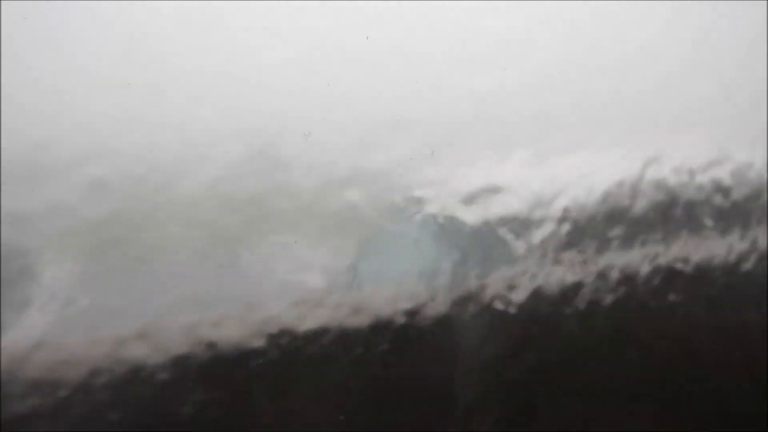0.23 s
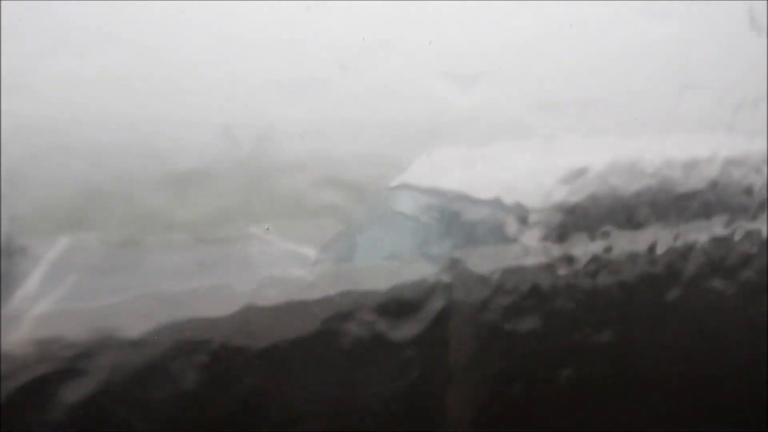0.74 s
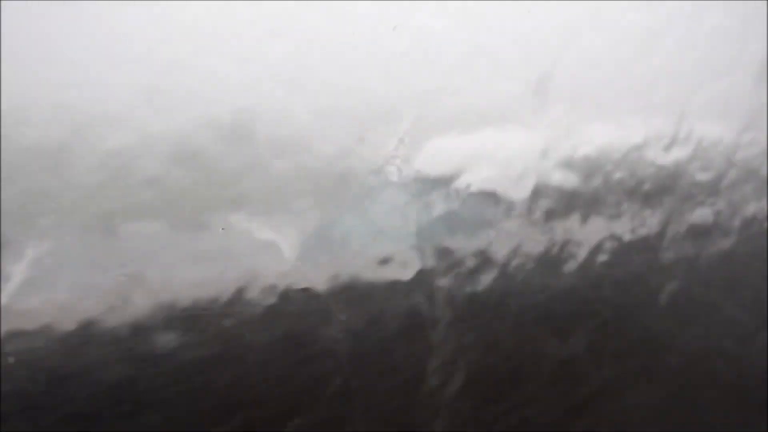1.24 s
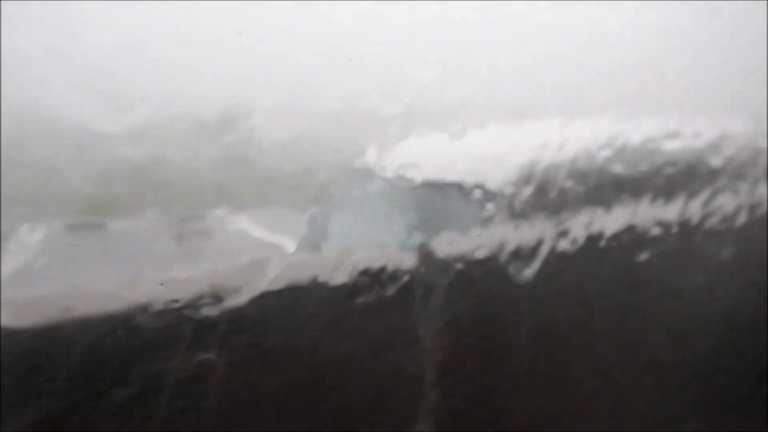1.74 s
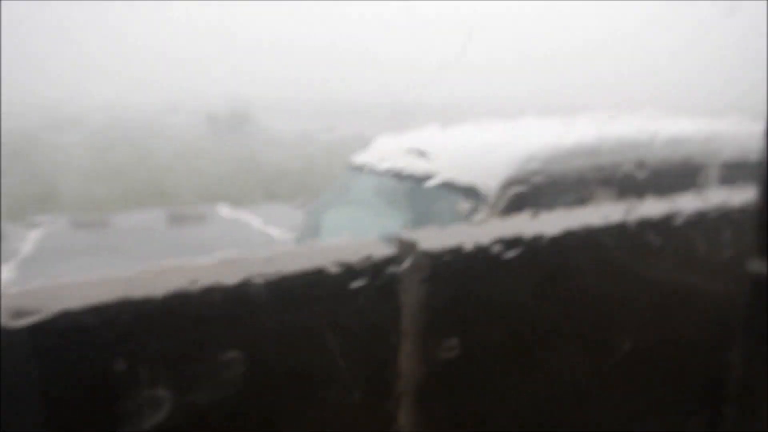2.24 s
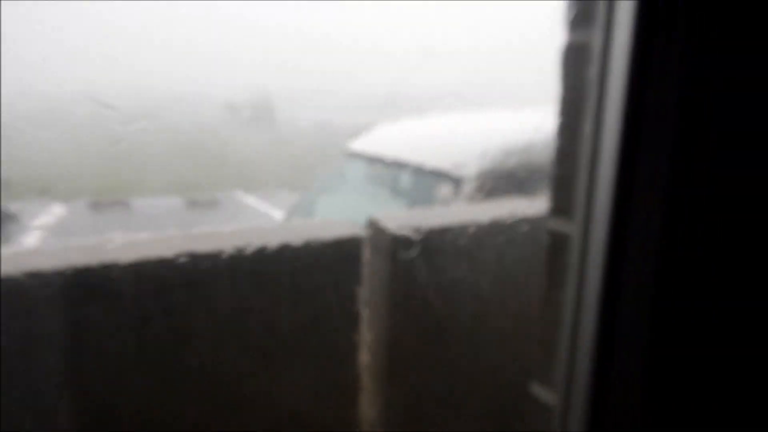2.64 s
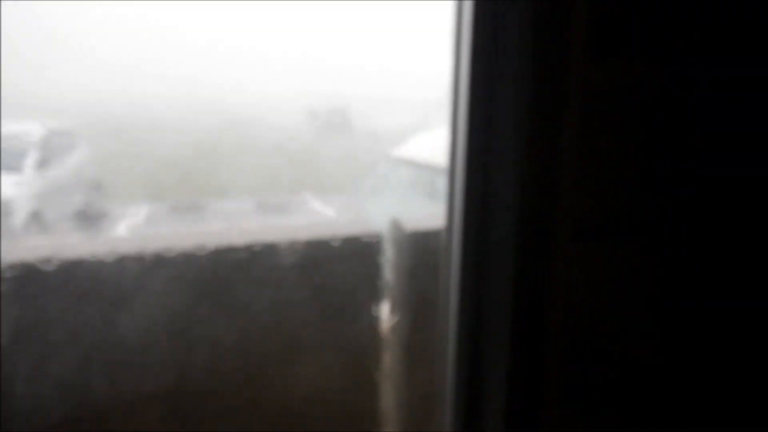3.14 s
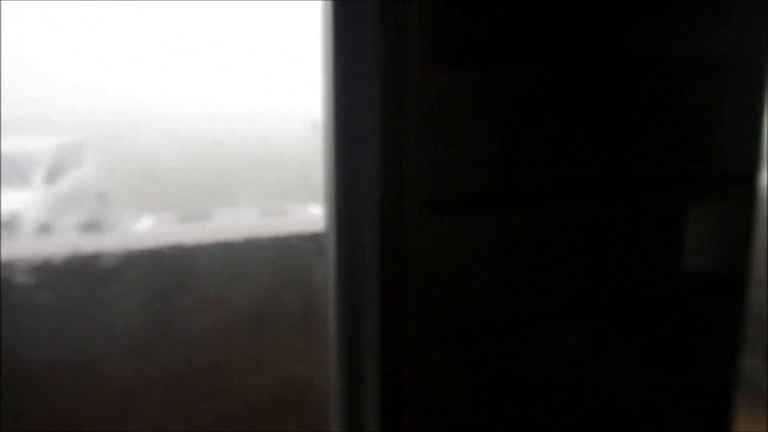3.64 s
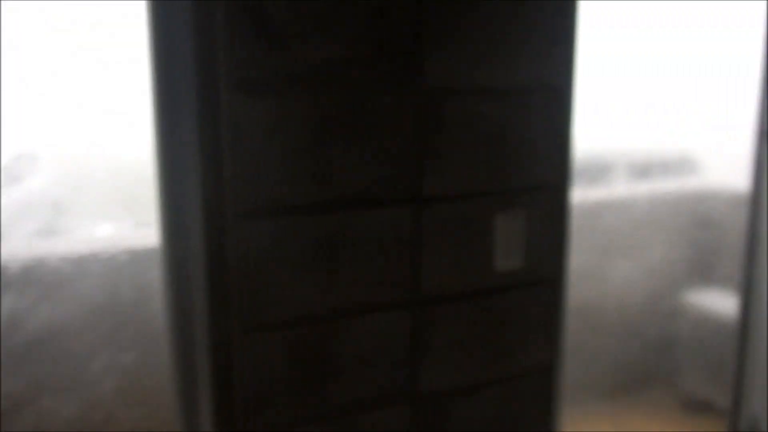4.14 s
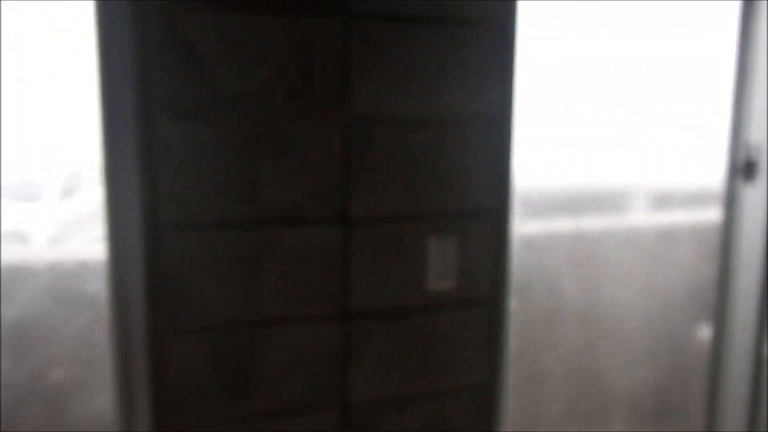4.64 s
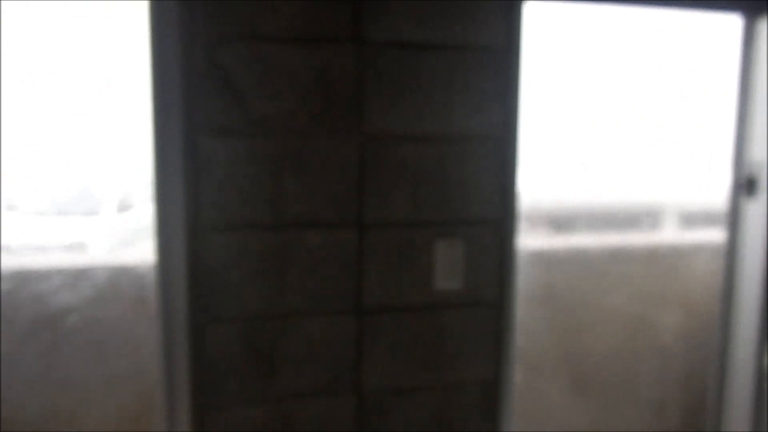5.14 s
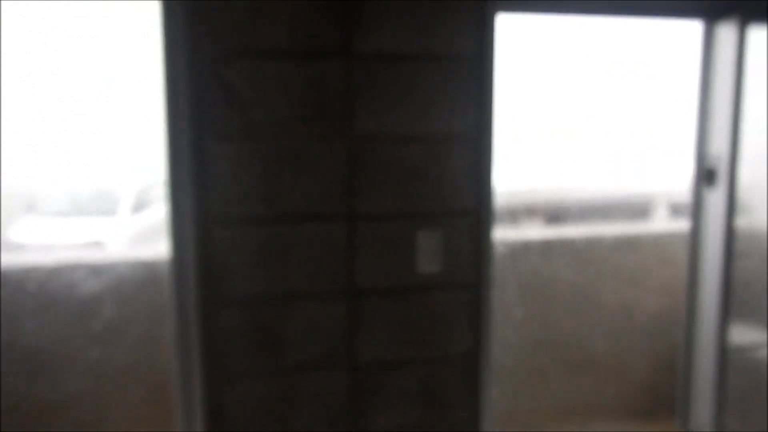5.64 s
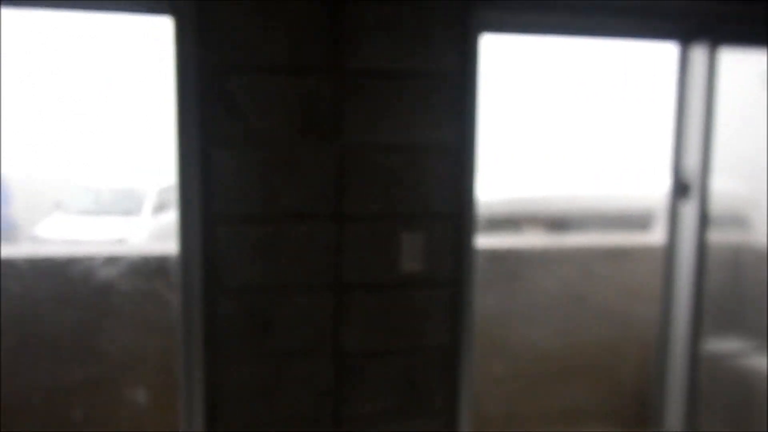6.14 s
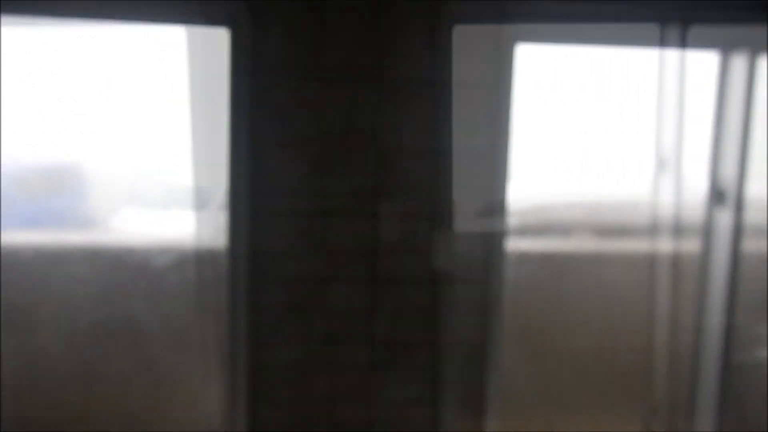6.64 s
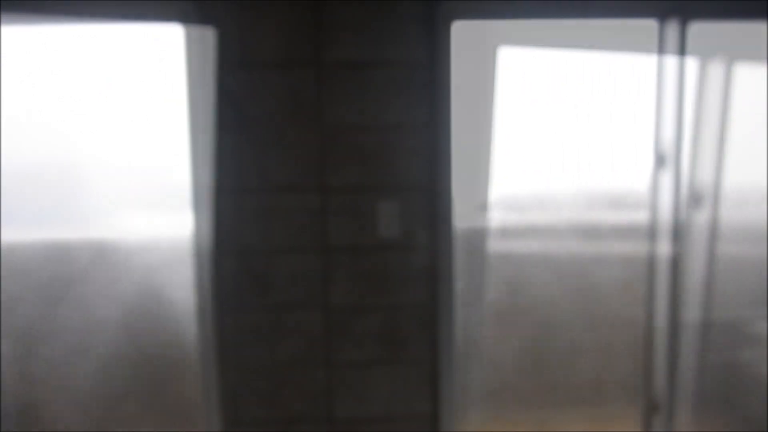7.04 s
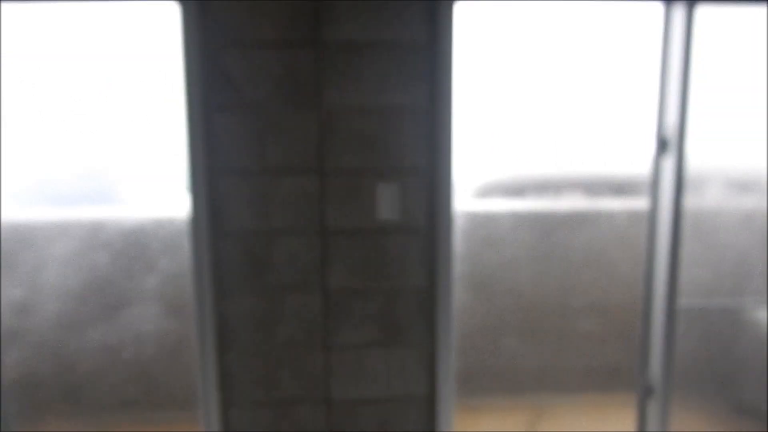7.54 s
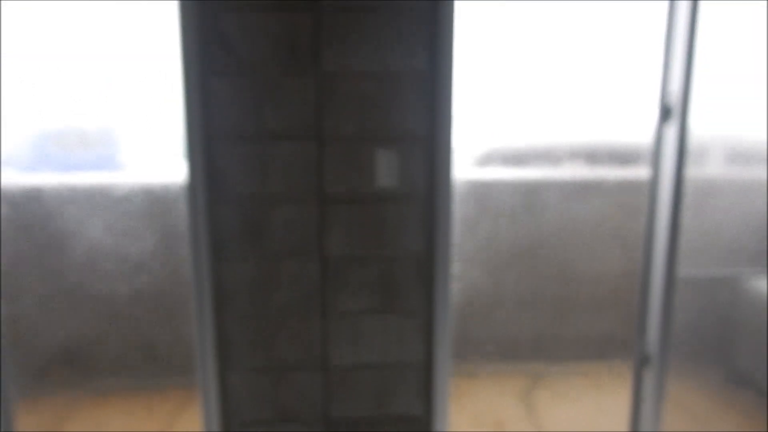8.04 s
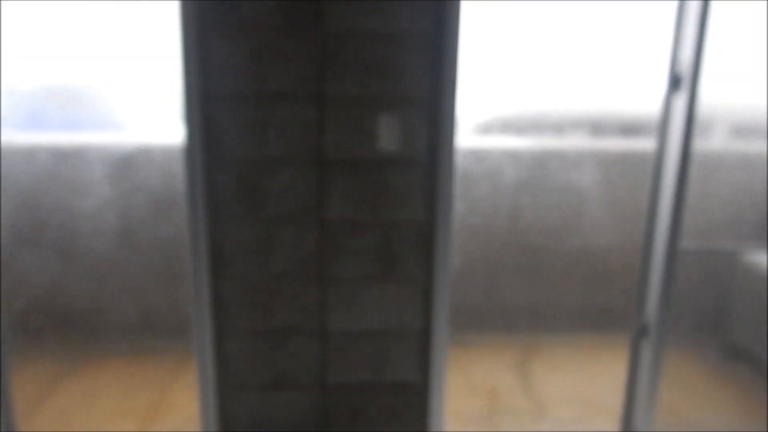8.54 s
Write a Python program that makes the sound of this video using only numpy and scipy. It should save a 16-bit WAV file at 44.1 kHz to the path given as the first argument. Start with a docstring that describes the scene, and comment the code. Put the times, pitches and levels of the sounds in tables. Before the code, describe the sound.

Storm rain lashes glass doors in dense hissing sheets while wind gusts thump and rumble low, loud at first, then easing and surging again.

```python
"""Inside a room with glass doors, a storm drives sheets of rain against the panes.
Spray fizzes close by: dense random taps and hiss, shaped by the colour of the ringing panes.
Behind it rain roars outdoors as smooth noise, and gusts rumble as lumpy low noise.
Wavering tones moan in the door frame, and a few heavy drops ring briefly.
Two close ports pick it all up through narrow notches, with a thin hiss on top."""
import sys
import numpy as np
from scipy import signal
from scipy.fft import rfft, irfft
from scipy.io import wavfile
from scipy.ndimage import uniform_filter1d

SR = 44100
rng = np.random.default_rng(int(sys.argv[2]) if len(sys.argv) > 2 else 0)


def ratio_of_db(decibels):
    """Turn decibels (scalar or array-like) into linear amplitude factors; 0 dB maps to 1."""
    return 10 ** (np.asarray(decibels, float) / 20)


def transcribe(signal):
    """Save signal, clipped to [-1, 1], as a 16-bit WAV file at the path in sys.argv[1]."""
    frames = np.atleast_2d(signal).T
    limited = np.clip(frames, -1, 1)
    pcm = np.round(limited * 32767).astype(np.int16)
    wavfile.write(sys.argv[1], SR, pcm)


N = 388080  # samples, 8.8 s


def evened(x):
    """Scales to rms 1."""
    return x / np.sqrt(np.mean(np.abs(x) ** 2) + 1e-20)


def read(points, hz):
    """Columns of a table over log frequency."""
    f, *columns = np.transpose(points)
    return np.squeeze([np.interp(np.log(hz + 1), np.log(f + 1), c) for c in columns])


def follow(rows, t):
    """Columns of a table over time."""
    s, *columns = np.transpose(rows)
    return [np.interp(t, s, c) for c in columns]


def smooth(curve):
    """Evaluates a slow curve every 100 samples and joins the dots."""
    t = np.arange(0, N + 100, 100) / SR
    return np.interp(np.arange(N) / SR, t, curve(t))


def hump_db(hz, centre_hz, width, db):
    """A resonance as a rise in level; width in Hz spans the points at half its dB."""
    return db / (1 + (2 * (hz - centre_hz) / width) ** 2)


def levelled(points, hz, low_hz, high_hz):
    """A spectrum for white input whose band low-high has power 1."""
    grid = np.arange(low_hz, high_hz)
    band_power = np.sum(ratio_of_db(2 * read(points, grid))) / (SR / 2)
    return read(points, hz) - 10 * np.log10(band_power)


def coloured(x, field_db, frame, patchy_db, patch_hz, patch_s):
    """Shapes two raw streams by a level field over frequency and time, with drifting patches."""
    overlap = frame * 3 // 4
    hz, t, z = signal.stft(x, SR, nperseg=frame, noverlap=overlap)
    patches = rng.standard_normal((len(t), len(hz)))
    patches = uniform_filter1d(patches, max(round(patch_s / t[1]), 1), 0)
    patches = uniform_filter1d(patches, max(round(patch_hz / hz[1]), 1), 1)
    gain = ratio_of_db(field_db(hz[:, None], t) + patchy_db * evened(patches).T)
    return signal.istft(z * gain, SR, nperseg=frame, noverlap=overlap)[1][:, :N]


def swells_db(events, t, rise, fall):
    """Summed level of swells that climb to each peak and sink at set dB a second."""
    s, peak_db = np.transpose(events)[:, :, None]
    each_db = peak_db - np.where(t < s, rise * (s - t), fall * (t - s))
    return 10 * np.log10(np.sum(ratio_of_db(2 * each_db), 0))


# Slow level of the wind rumble; the level drops suddenly at 1.5 and 7.55 s.
# Each row: time in seconds, relative level in dB.
SLOW_LEVEL = [(0, -27.5), (1.47, -29), (1.5, -34.5), (2.3, -40.5), (3.0, -41.5), (3.6, -41.5), (4.3, -42),
              (5.1, -42), (6.1, -42), (6.5, -34.5), (7.54, -33.5), (7.57, -40.5), (7.95, -39.5),
              (8.7, -38.5)]
# Single gusts that thump the building. Each row: time of the peak in seconds, relative peak in dB.
GUSTS = [(.14, -21), (.42, -26), (.68, -22.5), (1.24, -30), (3.76, -44), (4.6, -35.5), (5.3, -43),
         (5.86, -41), (6.42, -33.5), (7.14, -29.5), (8.23, -43), (8.8, -31.5)]


def rumble_level_db(t):
    """The slow level and the single gusts add as powers."""
    gusts_db = swells_db(GUSTS, t, rise=70, fall=78)  # dB per second
    return 10 * np.log10(ratio_of_db(2 * follow(SLOW_LEVEL, t)[0]) + ratio_of_db(2 * gusts_db))


# Colour of the building's rumble. Each row: frequency in Hz, relative level in dB per Hz.
BUILDING = [(15, -3.5), (24, 0.5), (38, -2), (60, -5.5), (90, -1.5), (140, -3), (220, -6.5), (400, -14.5),
            (1000, -28), (20000, -76)]
# Boom of the room under the gusts.
# Each row: time in seconds, boom in dB, deepest shudder in dB.
BOOM = [(0, 5.5, -4), (.9, 6.5, -4), (1.4, 4, -2.5), (2.8, 2.5, 2.5), (4.6, 3, -5), (5.7, 7.5, 4.5),
        (7, 4.5, 7), (8.3, 4, -3)]


def rumble():
    """Wind pressure is lumpy low noise, its level reshaped by the boom and the deepest shudder."""
    def field_db(hz, t):
        boom_db, shudder_db = follow(BOOM, t)
        building_db = levelled(BUILDING, hz, 84, 250)[:, None]
        return building_db + hump_db(hz, 136, 41, boom_db) + hump_db(hz, 25, 60, shudder_db)

    noise = rng.standard_normal((2, N))
    lumpy = coloured(noise, field_db, frame=3400, patchy_db=2.5, patch_hz=50, patch_s=0.12)
    return lumpy * ratio_of_db(smooth(rumble_level_db) - 4.0)


def moan(level_db, hz, waver_hz, waver_db):
    """Wind in a gap holds a tone whose pitch and strength waver."""
    strength, pitch = (evened(uniform_filter1d(uniform_filter1d(v, size=3000), size=3000))
                       for v in rng.standard_normal((2, N)))
    phase = 2 * np.pi * np.cumsum(hz + waver_hz * pitch) / SR
    return ratio_of_db(level_db + waver_db * strength) * np.sin(phase)


# Puffs through the gap that swell and die. Each row: time of the peak in seconds, peak in dB.
PUFFS = [(0, -21.5), (.7, -37), (1.12, -27), (1.46, -37), (2, -38), (2.34, -40), (2.7, -36), (3.42, -44.5),
         (3.91, -45), (4.53, -54), (4.99, -48), (5.63, -41), (6.08, -49), (6.3, -33), (6.54, -31),
         (6.83, -31), (7.15, -32), (7.5, -36), (7.77, -35.5), (8.42, -40.5), (8.8, -32)]
# Low moan, its pitch creeping up and back. Each row: time in seconds, central pitch in Hz.
LOW_PITCH = [(0, 55.5), (1.2, 57.8), (2.1, 55), (2.7, 58.8), (3.5, 56), (5, 61.7), (6.6, 69), (7.5, 70.2),
             (8.8, 64)]
# A fainter, higher moan late on.
# Each row: time in seconds, level in dB before the waver, central pitch in Hz.
HIGH_MOAN = [(4.95, -62, 262), (5.1, -45.5, 260.8), (5.9, -48.5, 249.5), (6.35, -43, 233),
             (7.6, -47.5, 233.7), (8.45, -41, 233), (8.8, -48.5, 238)]


def frame_moans():
    """Gaps of the door frame sound a low tone in puffs and a higher one late on."""
    t = np.arange(N) / SR
    puffs_db = smooth(lambda s: swells_db(PUFFS, s, rise=98, fall=39))  # dB per second
    low = moan(puffs_db, *follow(LOW_PITCH, t), waver_hz=3.9, waver_db=2)
    high = moan(*follow(HIGH_MOAN, t), waver_hz=3, waver_db=2)
    return low + high


# Colour of the rain outdoors. Each row: frequency in Hz, relative level in dB per Hz.
YARD = [(120, -9.5), (250, 0), (420, -7), (550, -2.5), (800, -3), (1200, 1), (1800, 1.5), (2400, -9),
        (4000, -25), (6200, -17), (8000, -25.5), (15500, -67)]
# How far each frequency follows the depth of the roar. Each row: frequency in Hz, share.
DEPTH = [(200, 0.25), (500, 0.96), (800, 0.032)]


def roar():
    """Distant rain is smooth noise that partly follows spray and slow level, which also deepens it."""
    def field_db(hz, t):
        spray_db = follow(SPRAY, t)[0] + 24  # above its usual -24 dB
        slow_db = follow(SLOW_LEVEL, t)[0] + 36  # above its usual -36 dB
        level_db = -33 + 0.3 * spray_db + 0.36 * slow_db
        depth_db = 1 + 0.37 * slow_db
        yard_db = levelled(YARD, hz, 250, 1386)[:, None]
        return yard_db + level_db + read(DEPTH, hz)[:, None] * depth_db

    noise = rng.standard_normal((2, N))
    return coloured(noise, field_db, frame=1024, patchy_db=0.46, patch_hz=300, patch_s=0.11)


# Heavy single drops.
# Each row: start in seconds, level in dB before the soft onset, ring in Hz.
DROPS = [(4.124, -12, 1270), (4.44, -12, 3900), (7.15, -8, 3800)]


def drops(t60=0.015, rise_s=0.0008):
    """A heavy drop is a short ring of the pane, sinking 60 dB in t60 seconds."""
    out, t = np.zeros(N), np.arange(2000) / SR
    for s, db, hz in DROPS:
        part = out[round(s * SR):][:len(t)]
        onset = 1 - np.exp(-t / rise_s)
        part += ratio_of_db(db - 60 * t / t60) * onset * np.sin(2 * np.pi * hz * t)
    return out


# Spray on the glass, sheet after sheet. Each row: time in seconds, relative level in dB.
SPRAY = [(0.0, -14), (0.42, -19), (0.46, -15.5), (0.78, -17.5), (0.83, -15.5), (0.98, -16.5), (1.22, -12.5),
         (1.81, -21.5), (2.13, -31), (2.55, -29), (2.7, -31.5), (2.84, -27), (3.26, -31), (3.48, -40.5),
         (3.65, -36), (3.7, -28), (3.97, -30.5), (4.09, -22.5), (4.36, -23.5), (4.44, -18), (4.8, -21.5),
         (4.92, -28), (4.97, -25.5), (5.32, -32), (5.66, -33), (5.78, -24), (5.86, -25.5), (6.15, -43.5),
         (6.59, -26.5), (6.69, -26), (6.74, -20.5), (6.86, -17), (7.03, -22), (7.08, -20), (7.5, -20),
         (7.57, -24.5), (7.72, -23.5), (7.97, -27.5), (8.21, -23), (8.38, -26.5), (8.8, -25.5)]
# Colour of the spray. Each row: time in seconds, extra low ring in dB, extra treble in dB,
# main pane ring in dB, main pane ring in Hz.
SHEETS = [(0, 2.5, 0.5, -2, 3830), (.8, 2, .5, -1, 3850), (1.5, 4.5, -2, 0, 3750), (1.8, 3, 1, 2, 3720),
          (2.1, 3.5, 2.5, 4, 3660), (2.9, 4.5, 1, -0.5, 3770), (3.75, 6, 0, 4.5, 3520),
          (4.3, 1.5, -5.5, 4.5, 3680), (4.9, 1, -1, 0.4, 3840), (5.5, 2.5, -2, 0, 3700),
          (5.8, -0.5, 5, 2.5, 3700), (6.5, -0.5, 3.5, 4.5, 3750), (6.9, -1.5, 0.5, 2, 3870),
          (7.7, 1, 2, 6, 4000), (8.8, 0, 1.5, 3, 3900)]
# Colour of the ringing panes. Each row: frequency in Hz, relative level in dB per Hz.
PANE = [(600, -31.5), (1100, -32.5), (1600, -9), (2200, -6.5), (3000, -5.5), (3700, -1.5), (4150, -7),
        (4600, -6), (5100, -10), (6100, -10), (7000, -17.5), (8000, -32), (10500, -39), (13000, -51),
        (15500, -67.5)]
# How far each frequency follows the weight (low ring) and the mist (treble) of the spray.
# Each row: frequency in Hz, share.
WEIGHT = [(1000, 0), (2300, 1), (3500, 0.19)]
MIST = [(4300, 0.09), (5500, 0.16), (9000, 1), (14000, 1)]


def spray(per_s=9000, spread_db=4.0, hiss=1.94, flicker_db=0.56):
    """Thousands of drops a second ring the panes; the finest merge into hiss."""
    size_db = spread_db * np.minimum(rng.exponential(1, (2, N)), 3)  # caps the largest drops
    size = ratio_of_db(size_db) * rng.choice([-1., 1.], (2, N))
    taps = evened(size * (rng.random((2, N)) < per_s / SR))
    raw = evened(taps + hiss * rng.standard_normal((2, N)))
    clumps = uniform_filter1d(uniform_filter1d(rng.standard_normal(N), size=700), size=700)
    # drops land in clumps
    level_db = follow(SPRAY, np.arange(N) / SR)[0] + flicker_db * evened(clumps)

    def field_db(hz, t):
        weight_db, mist_db, ring_db, ring_hz = follow(SHEETS, t)
        pane_db = levelled(PANE, hz, 2720, 7000)[:, None]
        low_db = read(WEIGHT, hz)[:, None] * weight_db
        treble_db = read(MIST, hz)[:, None] * mist_db
        return pane_db + low_db + treble_db + hump_db(hz, ring_hz, 580, ring_db)

    fizz = coloured(raw, field_db, frame=512, patchy_db=0.85, patch_hz=1530, patch_s=0.063)
    return ratio_of_db(level_db - 1.0) * fizz


# Narrow resonances of the glass doors. Each row: frequency in Hz, width in Hz, height in dB.
RINGS = [(482, 19, 2.5), (1117, 30, 5), (1500, 8.4, 8), (1975, 44, 4), (2203, 33, 5.5), (2370, 51, 6),
         (2645, 250, 2.5), (2900, 40, 2.5), (3830, 27, 3), (3900, 200, 1), (4590, 83, 3), (5350, 68, 5.5),
         (6000, 99, 6.5), (6210, 91, 5), (10330, 270, 2.5), (11600, 250, -0.5), (12700, 300, 2)]


def through_glass(streams):
    """The glass doors resonate, raising or lowering narrow bands; returns spectra."""
    hz = np.fft.rfftfreq(N, 1 / SR)
    glass = ratio_of_db(sum(hump_db(hz, *ring) for ring in RINGS))
    return glass * rfft(streams, axis=1)


# The pair of ports. Each row: frequency in Hz, phase in radians by which left leads,
# likeness from 0 to 1, left over right in dB.
PORTS = [(25, .9, 0.64, -4.5), (101, 0.25, 0.99, -4.5), (1070, 0.3, 1, -3.5), (1850, 0.25, 0.84, -2),
         (2000, 0.4, 0.8, -4.5), (3000, 0.22, 0.8, -0.1), (4000, .05, 0.87, 0), (4640, 0.2, 0.78, -1.5),
         (5000, .3, 1, 6), (4950, 1.35, 1, 0.7), (7000, 1.5, 0.8, -1.4), (7750, 1.5, 0.2, 2),
         (8100, 3.3, 0.97, -7.5), (9500, 3.14, 0.82, -4.5), (10450, 2.3, 0.43, -4.5), (11500, 3.1, 0, -2)]


def at_ports(near, other):
    """Two close ports hear the near spectrum shifted in phase; the right blends in the other."""
    lead, same, pan_db = read(PORTS, np.fft.rfftfreq(N, 1 / SR))
    same = np.clip(same, 0, 1)
    left = near * ratio_of_db(pan_db / 2)
    blend = same * near * np.exp(-1j * lead) + np.sqrt(1 - same ** 2) * other
    right = blend / ratio_of_db(pan_db / 2)
    return irfft(np.array([left, right]), N, axis=1)


def scene():
    """The sources ring the glass and reach two close ports."""
    # the single-stream moans and drops join both streams
    streams = rumble() + frame_moans() + roar() + drops() + spray()
    return at_ports(*through_glass(streams))


# Comb of narrow notch filters. Each row: frequency in Hz, width in Hz.
NOTCHES = [(2500, 273), (5000, 106), (6000, 95), (7000, 80), (8000, 79), (9000, 130), (10000, 72),
           (11000, 110)]


def notched(x):
    """Each notch filter takes out a narrow band."""
    for hz, width in NOTCHES:
        x = signal.lfilter(*signal.iirnotch(hz, hz / width, SR), x)
    return x


def band_limit(x):
    """A steep low-pass at the top of the band."""
    return signal.sosfilt(signal.butter(12, 15300, fs=SR, output="sos"), x)


def record(dry):
    """Notch filters, the thin hiss of the electronics, then full-scale clipping."""
    # differencing twice makes the hiss rise to the top
    hiss = ratio_of_db(-70) * np.diff(rng.standard_normal((2, N + 2)), n=2)
    mix = np.clip(notched(dry) + hiss, -1, 1)
    return band_limit(mix)


dry = scene()
out = record(dry)
transcribe(out)
```